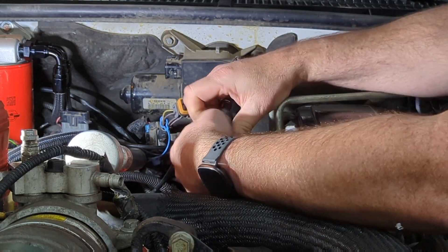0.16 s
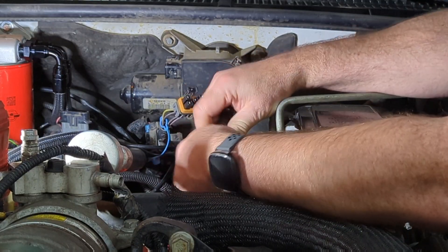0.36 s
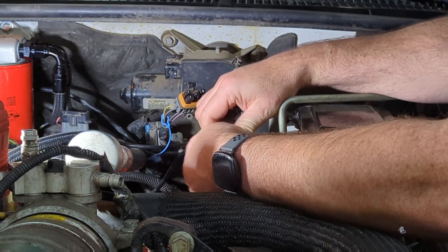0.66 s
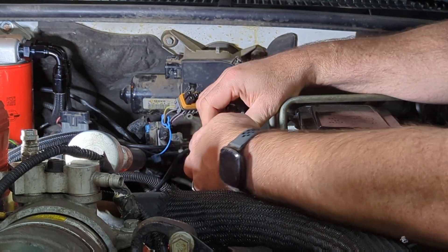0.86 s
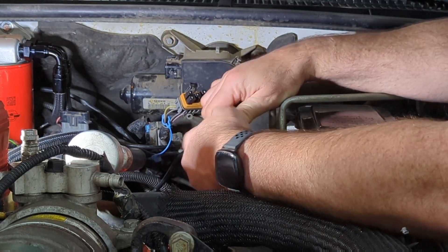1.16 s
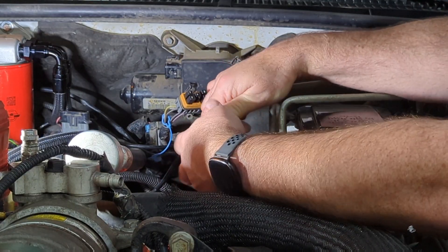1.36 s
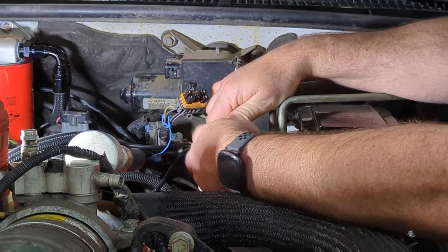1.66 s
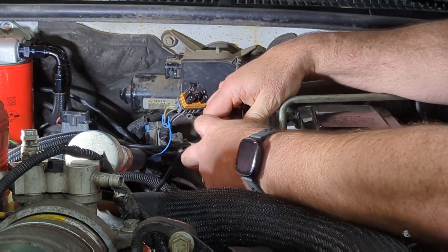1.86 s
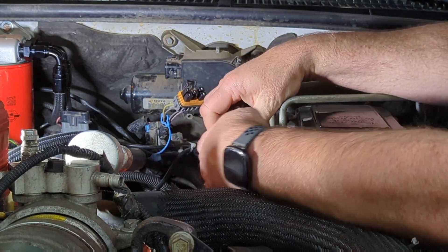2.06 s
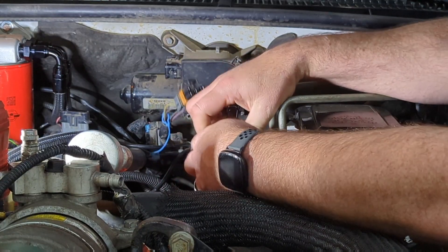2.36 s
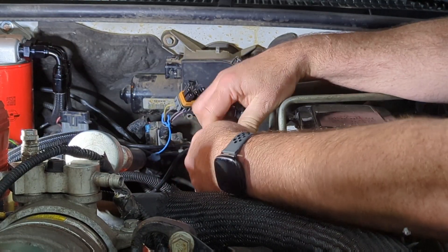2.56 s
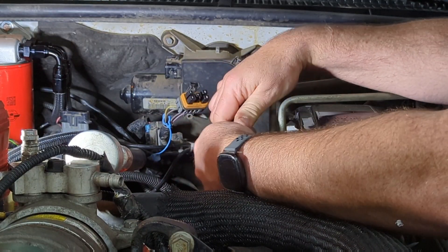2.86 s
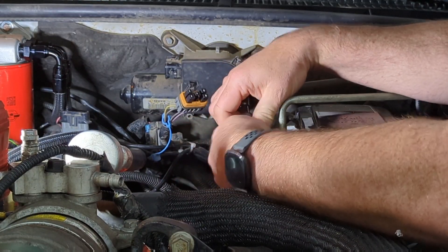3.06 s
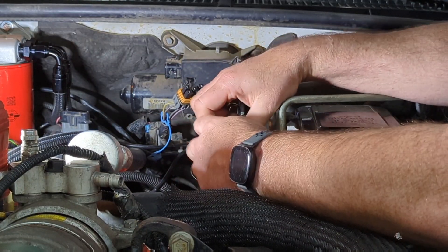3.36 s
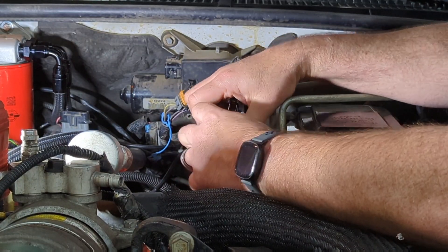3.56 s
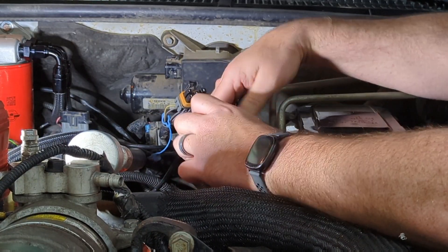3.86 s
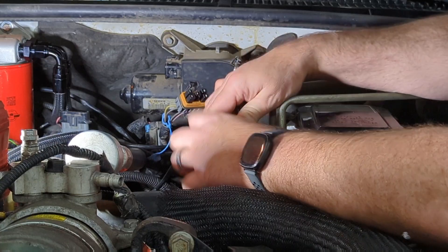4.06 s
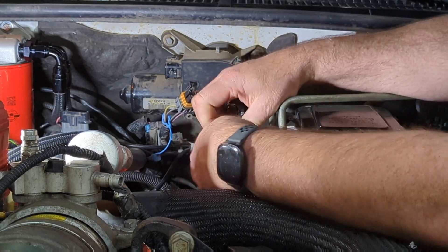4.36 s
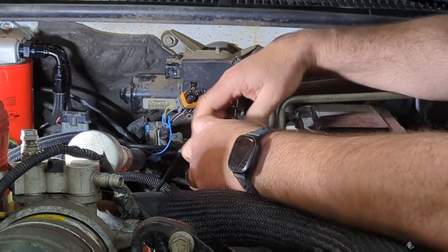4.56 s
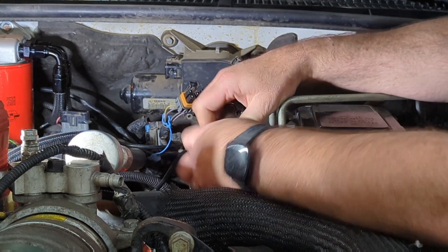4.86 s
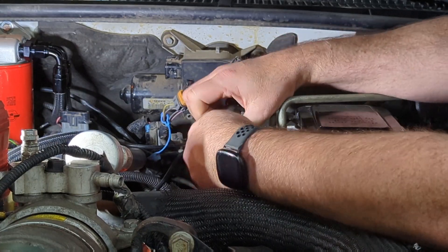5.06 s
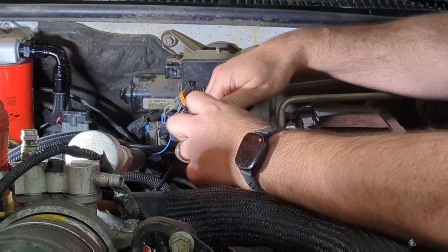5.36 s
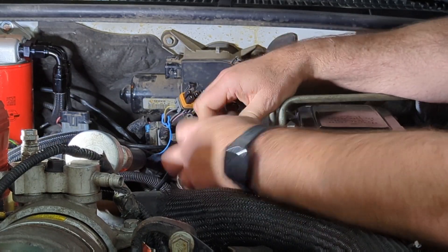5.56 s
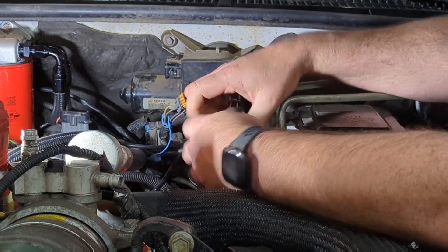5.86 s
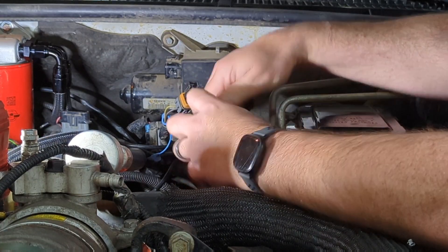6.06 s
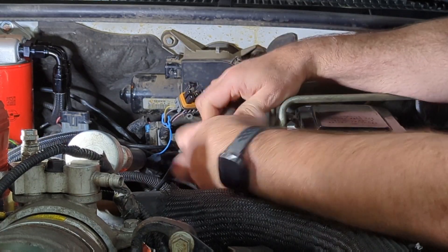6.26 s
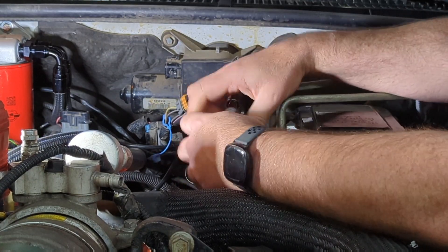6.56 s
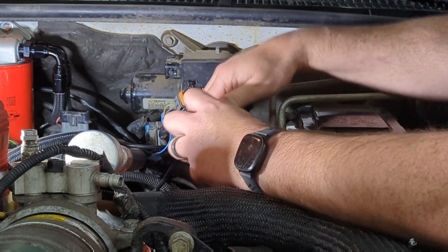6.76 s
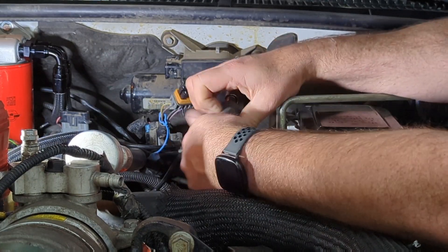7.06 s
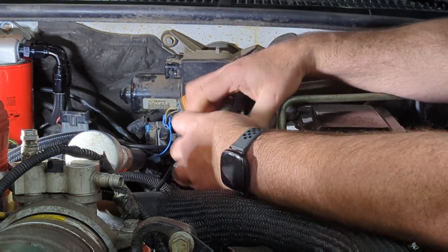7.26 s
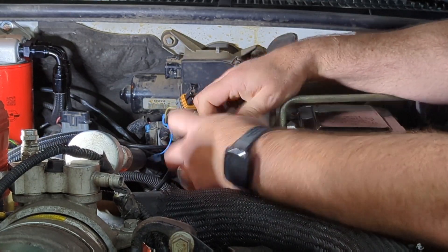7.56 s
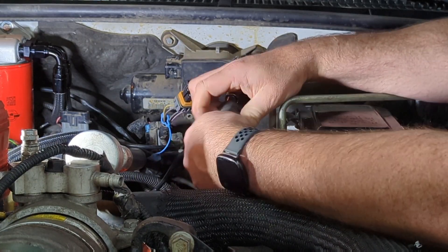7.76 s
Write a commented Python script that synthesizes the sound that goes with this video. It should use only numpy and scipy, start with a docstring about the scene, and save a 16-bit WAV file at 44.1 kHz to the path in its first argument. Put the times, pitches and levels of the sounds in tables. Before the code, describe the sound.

Hands fasten a hollow plastic cover inside a parked car's engine bay. Soft finger bumps come first, then a sharper double click and hollow knock a little past two seconds. After a sparser pause, clicks and knocks grow denser, with brief steel clinks from the screwdriver shaft and faint gritty screw turning. Close stereo microphone, quiet garage, short room echo, low rumble and hiss.

```python
"""In a quiet garage, a plastic cover is screwed down by hand in the engine bay of a parked car.
Soft steady hiss (coloured noise) and faint grinding of the screw (tiny random slips) run throughout.
From the first moments fingers bump the cover (decaying modes and noise); then the tool and screws
click on it (short noise bursts) and it knocks hollowly, with fidgeting and skin rubs (noise) between.
From about 4.3 to 6.5 seconds the steel shaft also clinks (brief decaying sines)."""
import sys
import numpy as np
from scipy import signal
from scipy.fft import rfft, irfft, next_fast_len
from scipy.io import wavfile
from scipy.ndimage import uniform_filter1d

SR = 44100
rng = np.random.default_rng(int(sys.argv[2]) if len(sys.argv) > 2 else 0)


def wrap_up_sound(samples):
    """Save the sound to the file named by the first command line argument, as 16-bit audio."""
    columns = np.atleast_2d(samples).T
    # keep every value between -1 and 1, then stretch to whole-number steps
    tamed = np.clip(columns, -1, 1)
    steps = np.round(tamed * 32767).astype(np.int16)
    wavfile.write(sys.argv[1], SR, steps)


N = 348831  # length of the scene in samples

# Colour of the background. Each row: frequency in Hz, relative level in dB.
HISS_COLOUR = [(27, -17), (52, 6.5), (130, 1), (250, -10.5), (400, -8.5), (650, -16), (880, -17.5),
               (1250, -10), (2200, -11), (4200, -15), (5700, -19), (6600, -18.5), (9500, -32), (14800, -34)]
# How alike the two ears are. Each row: frequency in Hz, likeness (0 unrelated, 1 or more identical).
EAR_LIKENESS = [(60, 1.26), (130, 0.5), (290, 1), (640, -0.05), (1400, 0), (15000, 0)]
# Balance of the background. Each row: frequency in Hz, left minus right in dB.
EAR_BALANCE = [(60, 3), (110, -3), (200, 4), (380, -2), (700, 0.5), (1290, -0.5), (2380, 1), (4400, -0.5),
               (8120, -6.5), (15000, 2.5)]
# Bouts of turning the screw. Each row: start in seconds, end in seconds, peak effort in dB.
TURNS = [(0.3, 2.1, -71), (2.5, 3.5, -72), (4.55, 5.47, -64.5), (5.97, 6.35, -67), (6.4, 7.38, -65),
         (7.35, 8.2, -65.5)]
# Fingers sliding over the plastic. Each row: start in seconds, end in seconds, peak rub level in dB.
RUBS = [(0.948, 1.153, -63.5), (1.734, 2.052, -59), (6.63, 6.68, -63.5), (7.056, 7.203, -67)]
# Clear modes of the cover. Each row: frequency in Hz, relative level in dB, time to fall 60 dB in seconds.
COVER_MODES = [(110, -20, 1), (132.4, -13.5, 0.95), (172.7, -12, 0.53), (200.5, 5.5, 0.18),
               (266.3, 1.5, 0.19), (303.7, -2.5, 0.13), (378.4, 6, 0.077), (491.4, 2.5, 0.076),
               (732, -1.5, 0.088), (1080, -7.5, 0.074)]
# Colour of the cover's many crowded modes. Each row: frequency in Hz, gain in dB.
COVER_COLOUR = [(25, -63), (60, -53), (120, -3), (200, 14), (330, -5.5), (500, 6.5), (800, -5.5),
                (1200, -1.5), (2000, -12), (4000, -27.5)]
# Soft finger bumps without a click. Each row: start in seconds, knock level in dB and hollow boom
# in dB relative to it (both before the shared trims), pitch of the struck spot in Hz.
BUMPS = [(0.12, -42.5, -10, 382), (0.623, -46.5, -21, 453), (0.721, -49, -5.5, 374),
         (1.208, -54.5, -5, 595), (1.323, -60, 0, 482), (1.842, -45.5, -17.5, 524), (2.686, -51, 0, 459),
         (4.776, -47.5, -10.5, 440), (5.05, -42.5, -24, 490), (5.248, -44, -17, 730), (5.314, -49, -7, 377),
         (6.185, -42, -8, 500), (6.654, -51, -21, 371), (6.83, -56, -24, 536), (7.01, -40, -8, 500),
         (7.123, -40, -29, 382), (7.165, -46, -6, 380)]
# Tool or screw meeting the plastic. Each row: start in seconds, click level in dB before a shared trim,
# its treble in dB and its body in dB (-11 leaves either as it is), knock level in dB and hollow boom
# in dB relative to it (both before shared trims), pitch of the struck spot in Hz.
CONTACTS = [(0.340, -47, -26, -11, -67, -8, 503), (0.839, -37, -12, -6.5, -53.5, -24, 800),
            (1.105, -42, -31, -13.5, -50, 0.5, 440), (1.507, -37.5, -15, -15, -40.5, -13, 496),
            (2.316, -31.5, -19, -13, -38.5, 7.5, 1000), (2.341, -27, -19, -9, -32.5, 5.5, 496),
            (2.515, -46.5, -26, -24, -32.5, 2, 470), (2.565, -40, -15, -16, -51, -4, 490),
            (3.172, -41, -20, -14, -56.5, -1.5, 520), (4.324, -41, -23, -21, -38.5, 7, 486),
            (4.35, -36.5, -21, -28, -41.5, -0.5, 495), (4.45, -39.5, -31, -17, -43, -5.5, 510),
            (4.853, -37.5, -14, -19.5, -47, -9.5, 500), (4.932, -43.5, -8, -14, -53, -4.5, 490),
            (5.028, -40.5, -17.5, -26, -45, -9, 510), (5.116, -46, -23, -13, -47.5, -5.5, 480),
            (5.184, -37, -15, -18, -38.5, -35, 766), (5.719, -36.5, -9, -14, -45.5, -8.5, 850),
            (5.763, -33, -13, -8, -38, -25, 517), (5.772, -28, -15.5, -11.5, -42, -7, 500),
            (6.077, -49.5, -24, -11, -41.5, -9.5, 500), (6.102, -41.5, -15.5, -11.5, -52.5, -1.5, 543),
            (6.469, -30.5, -17.5, -13, -50, -2, 600), (6.895, -55.5, -34, -23, -69, -7, 490),
            (7.088, -53.5, -23, -29, -43, -5, 463), (7.337, -42.5, -27, -19, -38.5, -4, 474),
            (7.466, -44.5, -17.5, -6, -48.5, -5.5, 524), (7.592, -43.5, -15, -15, -47.5, -25, 503),
            (7.767, -36, -13.5, -10, -39.5, -7.5, 846)]
# Colour of a click. Each row: frequency in Hz, gain in dB.
CLICK_COLOUR = [(400, -45), (900, -8), (1300, 1.5), (1800, 6), (2800, 1.5), (3600, -1), (5000, 0),
                (6500, -2), (8000, -4), (12000, -6.5), (15500, -15.5)]
# Blows that ring the shaft. Each row: start in seconds, ring level in dB, rough main pitch in Hz,
# level of the high ping in dB relative to the main ring.
CLINKS = [(4.328, -44.5, 5160, -30), (4.354, -39, 4530, -28), (4.449, -39.5, 5120, -25),
          (5.028, -38.5, 4810, -29), (5.773, -35, 4640, -29), (6.468, -36, 5080, -9.5)]
# Other modes of the shaft. Each row: rough frequency in Hz, level in dB relative to the main ring,
# time to fall 60 dB in seconds.
SHAFT_MODES = [(1783, -15.5, 0.095), (1913, -8.5, 0.011), (3520, -15.5, 0.033), (4010, -13.5, 0.036),
               (4840, -9, 0.023)]
# The two high bending modes of the shaft. Each row: rough frequency in Hz, time to fall 60 dB in seconds.
PING_MODES = [(11620, .011), (11790, .011)]
# Echo of the garage. Each row: frequency in Hz, time to fall 60 dB in seconds.
GARAGE_DECAY = [(100, 1), (170, 0.48), (250, 0.43), (800, 0.36), (3000, 0.22), (8000, 0.28), (15000, 0.26)]

HISS_DB = -62.38  # rms level of the background
IDLE_DB = -84     # effort that remains while the hand rests
EDGE_HZ = 15900   # upper edge of the whole sound
AGE = np.arange(12288) / SR  # seconds since a blow
BINS = np.fft.rfftfreq(len(AGE), 1 / SR)  # frequencies in Hz of one blow's spectrum


def amp(db):
    """Decibels to gain."""
    return 10 ** (np.asarray(db) / 20)


def read(points, hz):
    """Reads a table between its rows, on a log-frequency axis."""
    f, value = np.transpose(points)
    return np.interp(np.log(hz + 1), np.log(f + 1), value)


def add(mix, s, sound):
    """Lays a stereo sound into the mix at time s in seconds."""
    part = mix[:, max(round(s * SR), 0):][:, :sound.shape[1]]
    part += sound[:, :part.shape[1]]


def fade(t60):
    """Exponential decay that falls 60 dB in t60 seconds."""
    return amp(-60 * AGE / t60)


def close():
    """Fades the last tenth of a second of one blow to silence."""
    return np.minimum(1, 10 * (AGE[-1] - AGE))


def peaked(x, size=176):
    """Scales a sound so that its loudest stretch of size samples has rms 1."""
    power = uniform_filter1d((x ** 2).mean(0), size, mode="constant")
    return x / np.sqrt(power.max() + 1e-20)


def coloured(x, db):
    """Filters x with the gains db at BINS, with no sound ahead of the cause (minimum phase)."""
    both_sides = np.r_[db, db[-2:0:-1]]
    phase = -signal.hilbert(np.log(amp(both_sides))).imag[:len(db)]
    return irfft(rfft(x) * amp(db) * np.exp(1j * phase), len(AGE))


def pair(likeness, size):
    """Spectra of two white noises that are alike by the given amount."""
    a, b = rfft(rng.standard_normal((2, size)))
    c = np.clip(likeness, -1, 1)
    return np.array([a, c * a + np.sqrt(1 - c ** 2) * b])


def spot(width_hz, size=500):
    """Every spot of the plastic has its own resonances: a random ripple along BINS."""
    return np.interp(BINS / width_hz, np.arange(size), rng.standard_normal(size))


def swells(rows):
    """Gain over time for strokes that each rise and fall in one arch."""
    t = np.arange(N) / SR
    return sum(amp(db) * np.sin(np.pi * np.clip((t - a) / (b - a), 0, 1)) for a, b, db in rows)


def background():
    """Steady air: a low rumble largely shared by both ears, and a wide hiss."""
    size = 2 * next_fast_len(N // 2 + 1)
    hz = np.fft.rfftfreq(size, 1 / SR)
    likeness = read(EAR_LIKENESS, hz)
    z = pair(likeness, size) * amp(read(HISS_COLOUR, hz)) / np.sqrt(1 + likeness)
    balance = amp(np.outer([.5, -.5], read(EAR_BALANCE, hz)))
    x = irfft(z * balance)[:, :N]
    return amp(HISS_DB) * x / x.std()


def friction(level, per_s, low_hz, high_hz, spread_db=4.0, ring_t60=0.046, count=6):
    """Tiny slips of uneven size, each setting one of a few spots of the plastic ringing."""
    happens = rng.random(N) < per_s / SR
    sign = rng.choice([-1, 1], N)
    size = amp(spread_db * np.minimum(rng.exponential(1, N), 4))
    slips = happens * sign * size
    where = rng.integers(0, count, N)
    band = signal.butter(2, [low_hz, high_hz], "band", fs=SR, output="sos")
    x = 0
    for k in range(count):
        noise = irfft(pair(1 / (1 + BINS / 1200), len(AGE)))
        body = signal.sosfilt(band, noise * fade(ring_t60))[:, :SR // 10]
        x = x + signal.oaconvolve((slips * (where == k))[None], body, axes=1)[:, :N]
    return level * x / x.std()


def handling(grind_db=-3):
    """The screw grinds in coarse ringing slips; skin rubs as a smooth band of noise."""
    effort = swells(TURNS) + amp(IDLE_DB)
    grind = friction(amp(grind_db) * effort, per_s=160, low_hz=245, high_hz=1650)
    band = signal.butter(2, [1500, 5500], "band", fs=SR, output="sos")
    skin = signal.sosfilt(band, rng.standard_normal((2, N)))
    return grind + swells(RUBS) * skin / skin.std()


def panel(side=0.23):
    """The ring of the cover's clear modes, each starting a little differently at each ear."""
    ring = 0
    for hz, level, t60 in COVER_MODES:
        phase = side * rng.standard_normal((2, 1))  # radians
        ring = ring + amp(level) * fade(t60) * np.sin(2 * np.pi * hz * AGE + phase)
    return peaked(ring)


def knock(ring, db, boom_db, spot_hz):
    """The cover flexes: light bumps favour the struck spot, firm blows ring the whole panel."""
    firm = np.clip(amp(db + 42), .45, 1)
    noise = pair(1 / (1 + BINS / 1300), len(AGE))
    # the plastic damps its higher modes sooner
    slow = 1 / (1 + (BINS / 700) ** 4)
    dying = irfft(noise * slow) * fade(0.12) + irfft(noise * (1 - slow)) * fade(0.096)
    local_db = 7 / (1 + ((BINS / spot_hz - 1) / .22) ** 2)
    crowd = coloured(dying, read(COVER_COLOUR, BINS) + local_db + 3.6 * spot(116.0))
    # a small panel radiates little deep bass
    radiate = BINS ** 2 / (BINS ** 2 + 150 ** 2)
    z = rfft(firm * ring + 0.41 * peaked(crowd)) * radiate
    # the low notes arrive up to 23 ms after the blow, so the thud sinks in pitch
    delay = 0.023 / (1 + (BINS / 345) ** 4)
    z = z * np.exp(-2j * np.pi * np.cumsum(delay) * BINS[1])
    low = 1 / (1 + (BINS / 345) ** 8)
    boom_gain_db = 6  # shared lift of the boom
    body = peaked(irfft(z * (1 - low))) + amp(boom_db + boom_gain_db) * peaked(irfft(z * low))
    return amp(db) * body * close()


def click(db, top_db, body_db, pan_db):
    """A sharp contact and a small rebound, followed by their scatter among the engine parts."""
    x = rng.standard_normal((2, len(AGE))) * (fade(.052) + 0.48 * fade(.016))
    x[:, 4] += 2.4  # the direct contact
    bounce_s = .005 * (.5 + rng.random())
    x = x + 0.11 * np.roll(x, round(bounce_s * SR), 1)
    # a hard tip adds treble, a thin spot of the cover adds body
    treble = np.clip(np.log2((BINS + 1) / 4200), 0, 1) * (top_db + 11)
    body = np.clip(np.log2(3600 / (BINS + 1)), 0, 1) * (body_db + 11)
    x = coloured(x, read(CLICK_COLOUR, BINS) + treble + body + 3.0 * spot(225.5))
    # a very faint copy of the click comes about 1 ms ahead of it
    x = 0.027 * x + np.roll(x, round(0.001017 * SR), 1)
    return amp(db) * peaked(x) * amp([[pan_db / 2], [-pan_db / 2]])


def shudder(db, low_hz=55, high_hz=125, swell_s=0.023, t60=0.47):
    """The parts under the cover take up a blow and rumble on after it."""
    band = signal.butter(2, [low_hz, high_hz], "band", fs=SR, output="sos")
    rumble = signal.sosfilt(band, irfft(pair(1.0, len(AGE))))
    x = rumble * (1 - np.exp(-(AGE / swell_s) ** 2)) * fade(t60)
    return amp(db) * peaked(x, size=880) * close()


def fidget(ring, bump_db=4, tick_db=7, spread_db=2, count=44):
    """Faint bumps and ticks of the fingers, more frequent and firmer the harder the screw grinds."""
    out, t = np.zeros((2, N)), np.arange(N) / SR
    effort = swells(TURNS) + amp(IDLE_DB)
    # equal shares of the total effort lie between one fidget and the next, on average
    work = np.cumsum(effort)
    share = (np.arange(count) + rng.random(count)) / count
    times = np.interp(share, work / work[-1], t)
    for s, (a, b, c) in zip(times, rng.standard_normal((count, 3))):
        db = 20 * np.log10(np.interp(s, t, effort)) + spread_db * a
        add(out, s, knock(ring, db + bump_db, boom_db=1, spot_hz=480 * np.exp(0.063 * b)))
        add(out, s, click(db + tick_db, top_db=-28, body_db=-7, pan_db=2 * c))
    return out


def clink(db, ring_hz, ping_db):
    """The steel shaft rings briefly, damped by the hand; each ear hears its own reflections."""
    modes = list(SHAFT_MODES) + [(ring_hz, 0, .008)]
    modes += [(hz, ping_db, t60) for hz, t60 in PING_MODES]
    ring = 0
    for hz, level, t60 in modes:
        pitch = hz * rng.normal(1, 0.011)  # each blow shifts every mode slightly
        ring = ring + amp(level) * fade(t60) * np.sin(2 * np.pi * pitch * AGE)
    paths = 0.084 * rng.standard_normal((2, len(AGE))) * fade(0.062)
    paths[:, 0] += 1  # the direct path
    return amp(db) * peaked(signal.fftconvolve(ring[None], paths, axes=1)[:, :len(AGE)])


def garage(x, build_s=0.012):
    """A diffuse tail that builds up quickly and dies at a different pace at each pitch."""
    likeness = read(EAR_LIKENESS, np.fft.rfftfreq(SR, 1 / SR))
    hz, t, z = signal.stft(irfft(pair(likeness, SR)), SR, nperseg=256)
    decay = amp(-60 * t / read(GARAGE_DECAY, hz)[:, None])
    build = 1 - np.exp(-t / build_s)
    tail = signal.istft(z * decay * build, SR, nperseg=256)[1]
    return signal.fftconvolve(x, tail / np.linalg.norm(tail[0]), axes=1)[:, :N]


def scene():
    """Sets off every contact, then adds the echo of the garage and the background."""
    # shared trims in dB
    click_db, knock_db, shudder_db = -6.5, -5, -19
    bump_db, bump_boom_db = -10.0, 4
    plastic, steel, low = np.zeros((3, 2, N))
    ring = panel()
    for s, tip_db, top_db, body_db, flex_db, boom_db, spot_hz in CONTACTS:
        add(plastic, s, click(tip_db + click_db, top_db, body_db, pan_db=2))
        add(low, s, knock(ring, flex_db + knock_db, boom_db, spot_hz))
        add(low, s, shudder(flex_db + boom_db + shudder_db))
    for s, db, ring_hz, ping_db in CLINKS:
        add(steel, s, clink(db, ring_hz, ping_db))
    for s, db, boom_db, spot_hz in BUMPS:
        add(low, s, knock(ring, db + bump_db, boom_db + bump_boom_db, spot_hz))
    low = low + fidget(ring) + handling()
    wet = garage(amp(-10) * plastic + amp(-16) * steel + amp(-17) * low)
    return plastic + steel + low + wet + background()


def record(dry):
    """Removes the highest treble, above EDGE_HZ, with a steep low-pass filter."""
    low_pass = signal.firwin(255, EDGE_HZ, window=("kaiser", 9), fs=SR)
    return signal.oaconvolve(dry, low_pass[None], "same")


dry = scene()
out = record(dry)
wrap_up_sound(out)
```